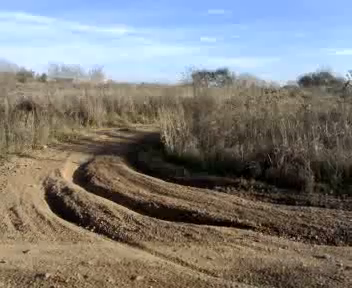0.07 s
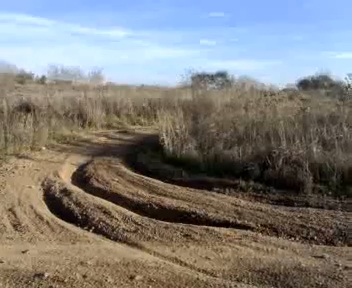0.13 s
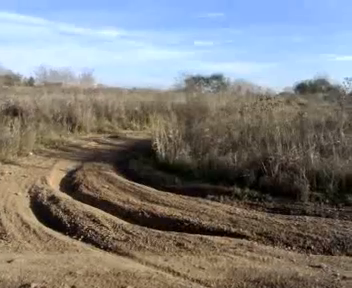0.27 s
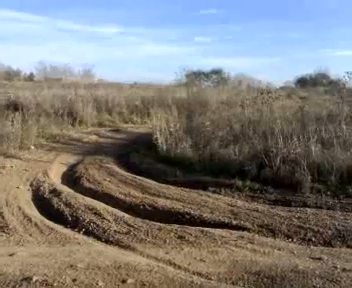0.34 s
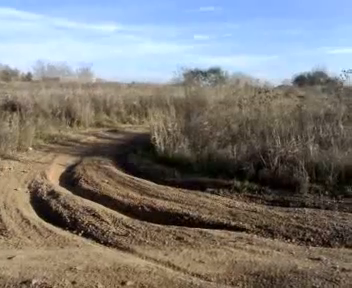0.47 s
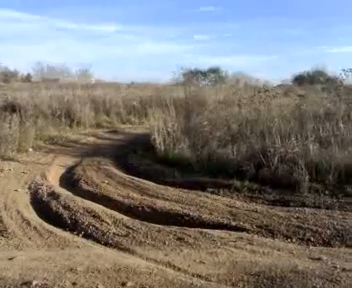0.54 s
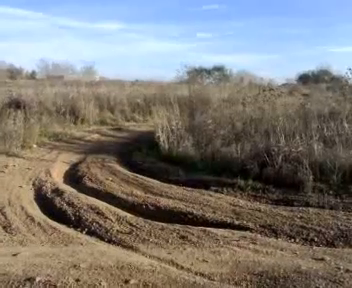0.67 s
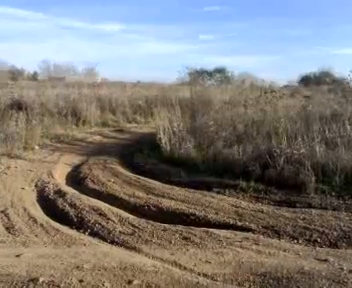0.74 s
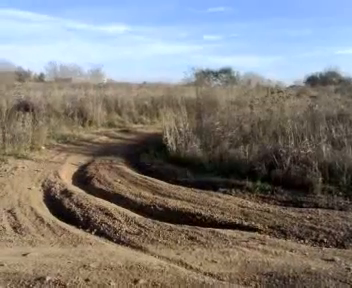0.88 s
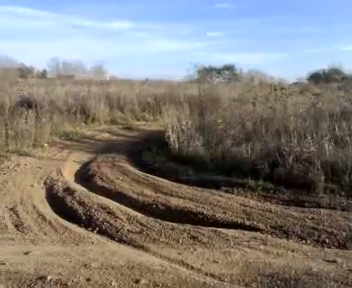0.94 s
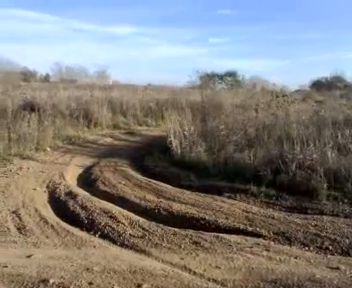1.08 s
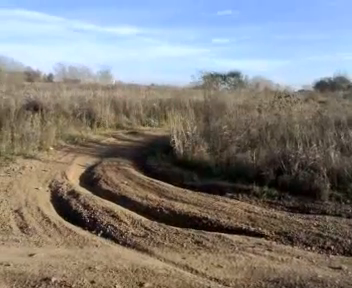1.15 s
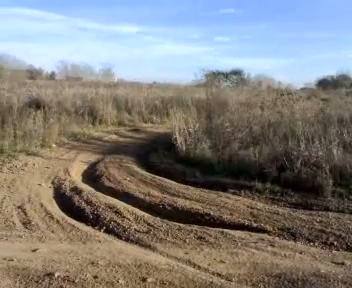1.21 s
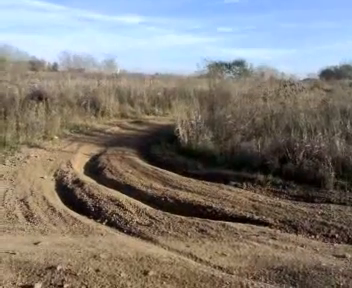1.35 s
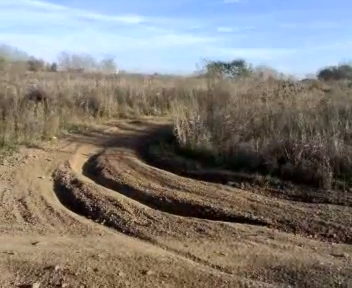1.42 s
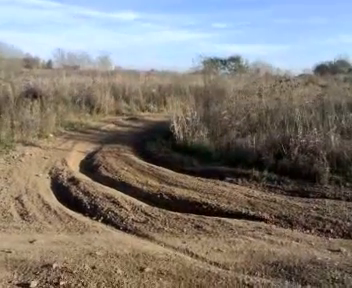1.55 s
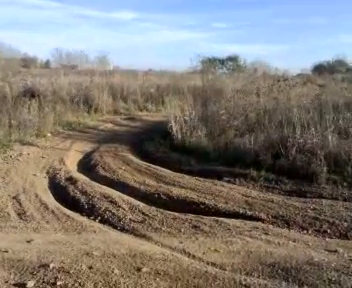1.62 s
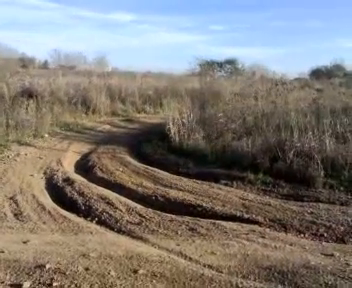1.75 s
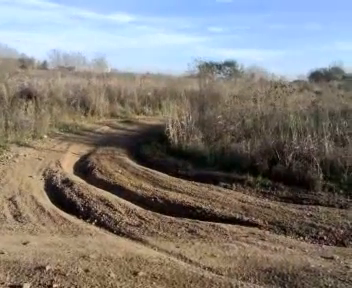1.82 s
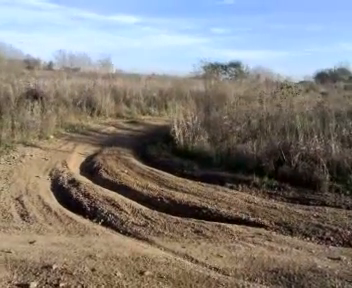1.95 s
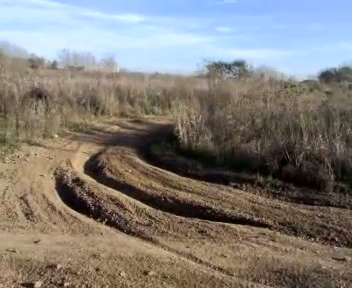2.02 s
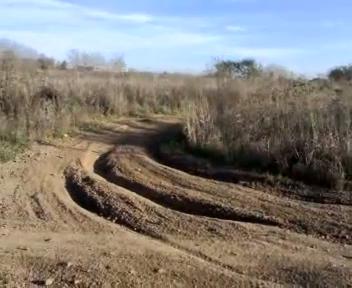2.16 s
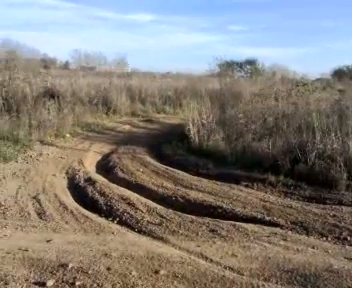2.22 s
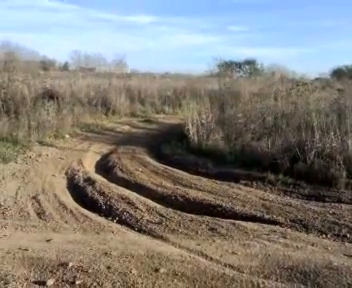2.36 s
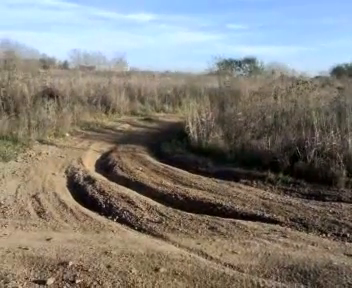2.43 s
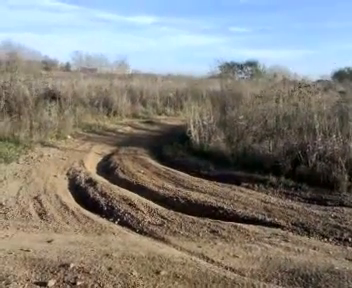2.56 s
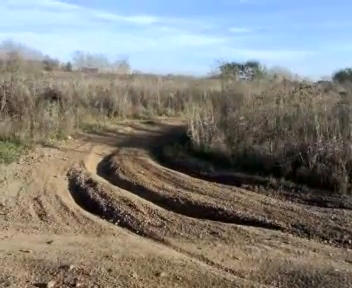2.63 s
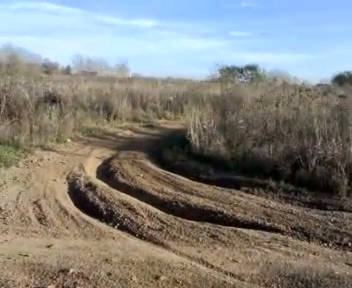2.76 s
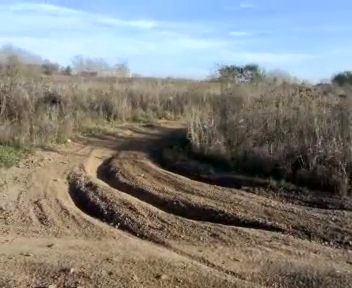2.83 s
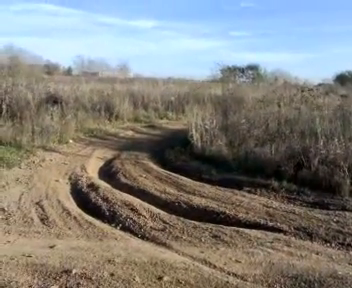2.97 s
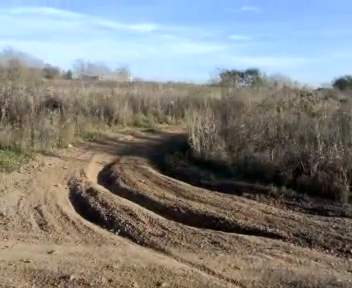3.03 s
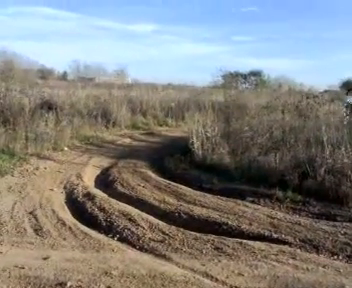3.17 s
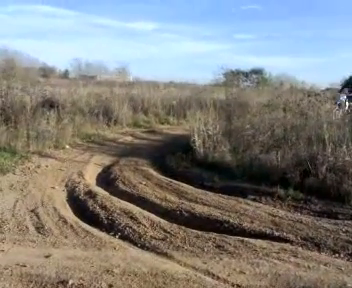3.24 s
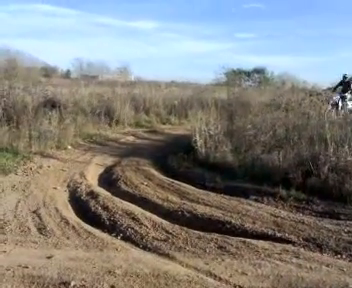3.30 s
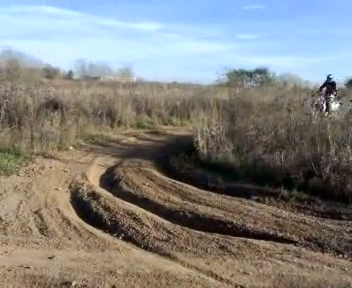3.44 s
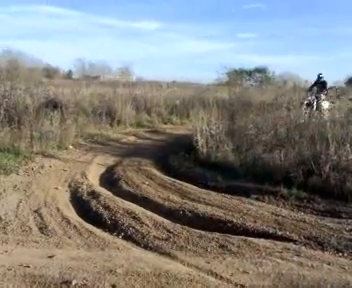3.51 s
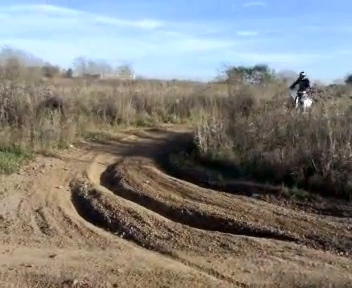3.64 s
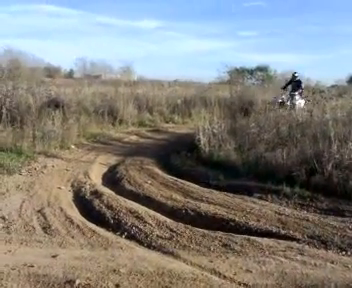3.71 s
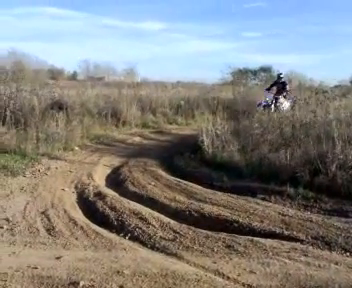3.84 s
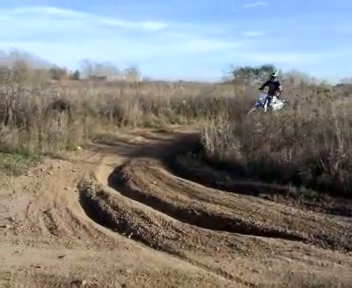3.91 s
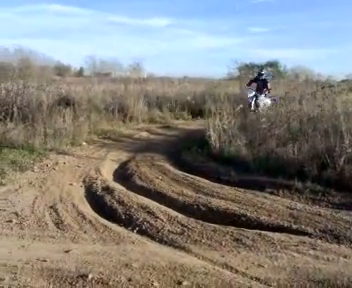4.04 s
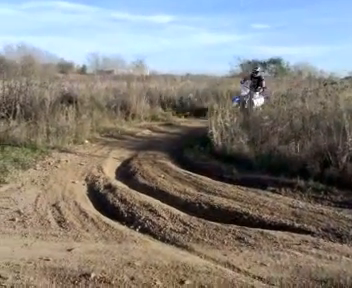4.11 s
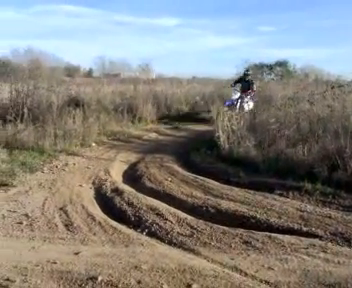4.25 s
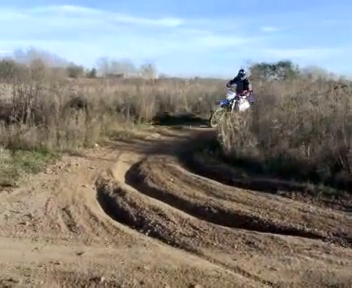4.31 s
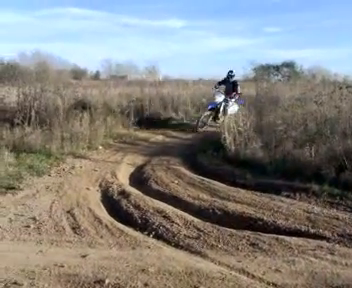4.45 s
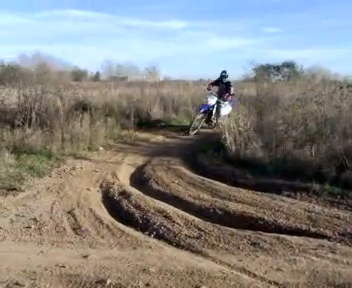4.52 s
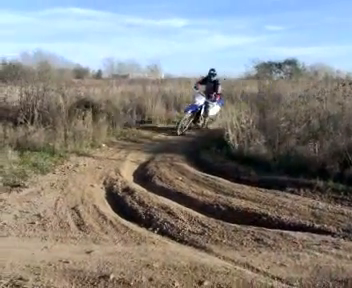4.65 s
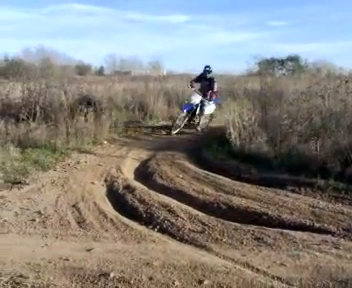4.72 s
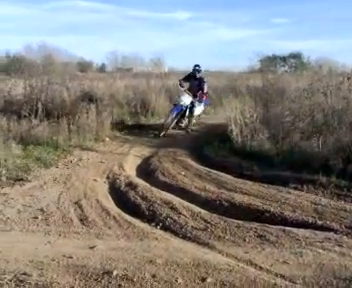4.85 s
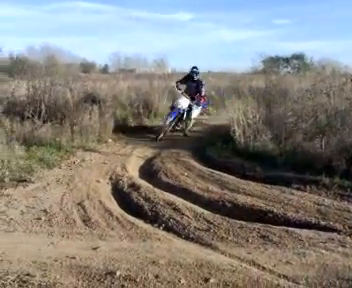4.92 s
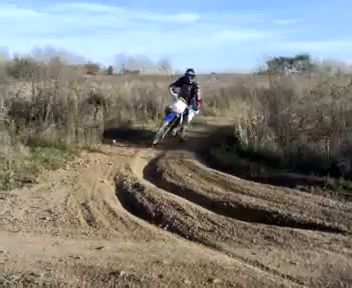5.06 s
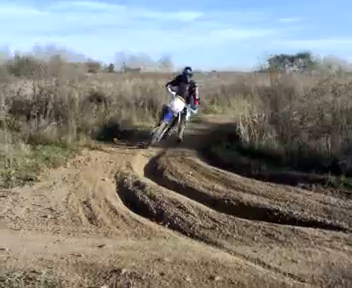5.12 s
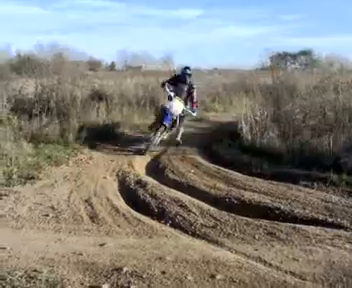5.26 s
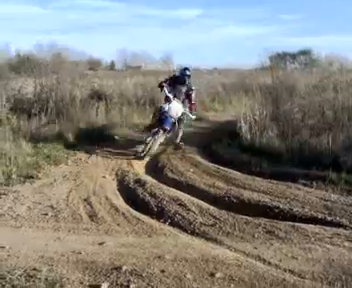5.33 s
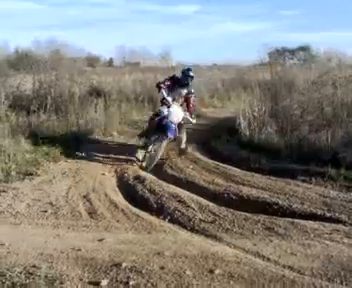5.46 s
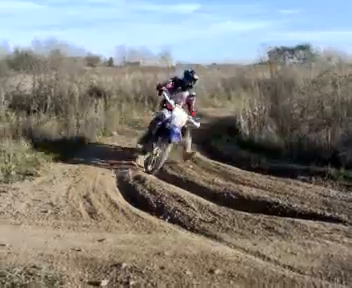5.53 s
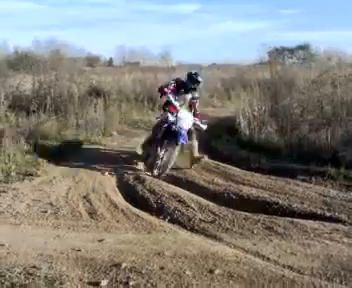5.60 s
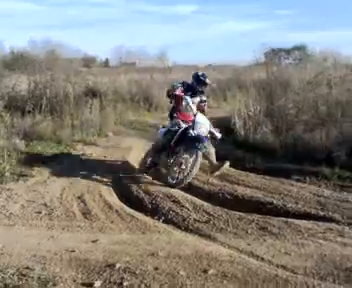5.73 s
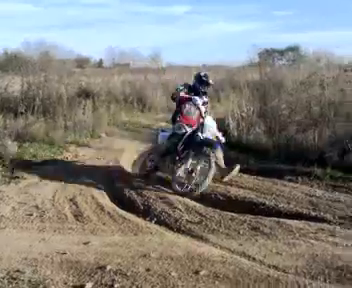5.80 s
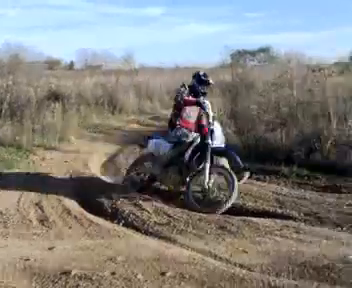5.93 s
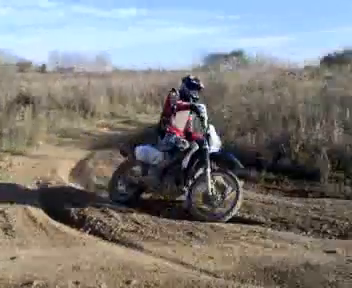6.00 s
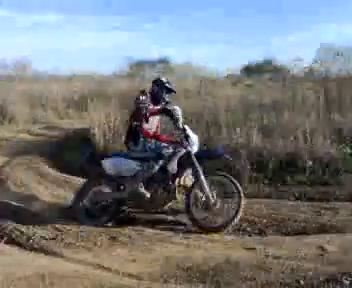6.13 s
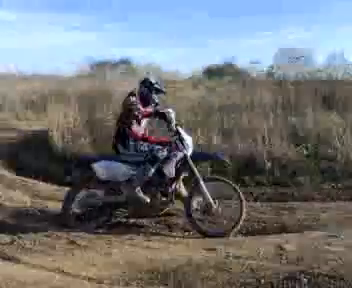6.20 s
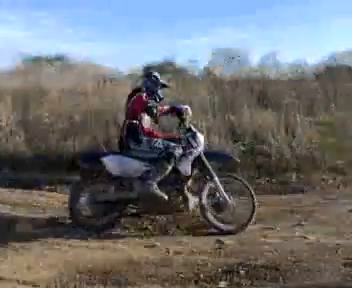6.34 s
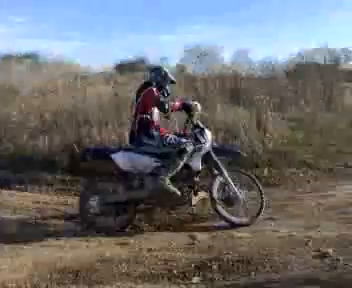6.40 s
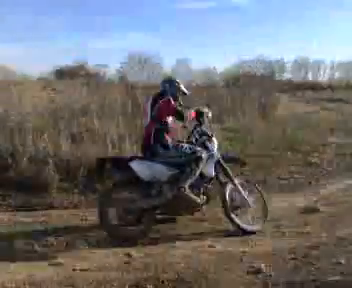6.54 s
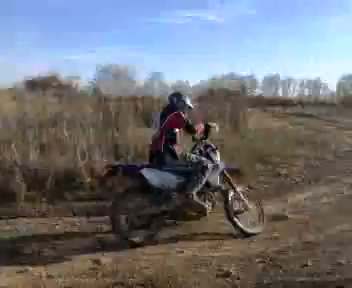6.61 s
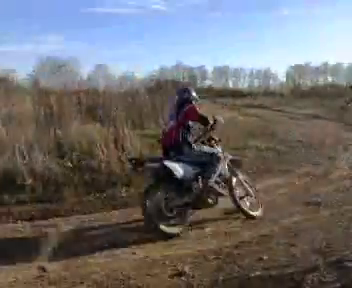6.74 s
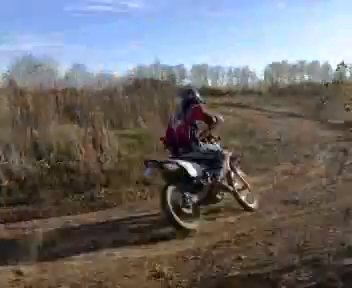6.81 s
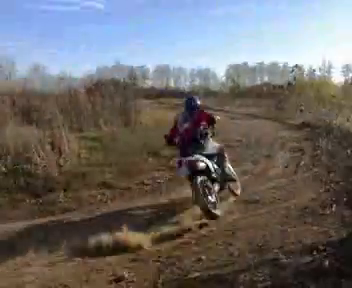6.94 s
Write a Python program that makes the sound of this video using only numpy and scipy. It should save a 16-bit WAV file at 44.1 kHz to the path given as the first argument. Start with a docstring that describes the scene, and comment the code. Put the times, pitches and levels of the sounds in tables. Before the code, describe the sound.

Light wind rumbles on a small microphone beside a dirt track as a four-stroke dirt bike approaches. Its pulsing engine climbs in pitch, then falls back to a chug for a corner, amid bright rattles and faint ticks of grit. After a short rev and a hollow knock, several bursts of throttle bring it right past, the exhaust barking and the engine ringing metallically, loudest at the end.

```python
"""A single-cylinder four-stroke dirt bike comes through tall grass, rounds a dirt corner and passes close.
Each firing sends a puff down the exhaust, which booms and barks, and knocks the engine cases, which
clatter and ping. Loose parts rattle over the ruts and grit ticks against the frame. Underneath are a
faint hum and a light wind buffeting a small microphone, which switches on abruptly."""
import sys
import numpy as np
from scipy import signal
from scipy.io import wavfile
from scipy.ndimage import uniform_filter1d

SR = 44100
rng = np.random.default_rng(int(sys.argv[2]) if len(sys.argv) > 2 else 0)


def output_pcm(signal):
    """Save a mono or channel-first signal as 16-bit PCM at the path in sys.argv[1].

    Samples are clipped to [-1, 1] before scaling.
    """
    pcm = np.clip(np.atleast_2d(signal).T, -1, 1) * 32767
    wavfile.write(sys.argv[1], SR, np.round(pcm).astype(np.int16))


N = 307377
TIME_S = np.arange(N) / SR


def gain_of(db):
    return 10 ** (np.asarray(db) / 20)


def between(ends, share):
    return ends[0] + (ends[1] - ends[0]) * share


def unit_rms(x):
    return x / np.sqrt(np.mean(x ** 2) + 1e-20)


def steadied(x, size=6000):
    """Divides out the level, averaged over size samples."""
    return x / np.sqrt(abs(uniform_filter1d(x ** 2, size)) + 1e-12)


def curves(rows):
    """One automation curve for each column after the time."""
    times, *columns = np.transpose(rows)
    return [np.interp(TIME_S, times, column) for column in columns]


def eq_curve(points, hz):
    """Joins the points along a log-frequency axis, as a column."""
    points_hz, values = np.transpose(points)
    return np.interp(np.log(hz + 1), np.log(points_hz + 1), values)[:, None]


def drift(size):
    """A random wander, smoothed over size samples."""
    return unit_rms(uniform_filter1d(uniform_filter1d(rng.standard_normal(N), size), size))


def resonate(x, hz, width_hz):
    """A resonance that can glide: shifts hz down to zero, smooths, and shifts back."""
    turn = np.exp(2j * np.pi * np.cumsum(hz * np.ones(len(x))) / SR)
    pole = np.exp(-np.pi * abs(width_hz) / SR)
    return 2 * (turn * signal.lfilter([1 - pole], [1, -pole], x / turn + 1e-18)).real


def ring(x, hz, width_hz):
    """A resonance with steep skirts and a soft attack."""
    return resonate(resonate(x, hz, 3 * width_hz), hz, width_hz)


# Partials of the hum: pitch_hz, level_db
HUM_PARTIALS = [(96.9, -42.5), (193.8, -45.5), (242.2, -53)]
# Fader on the whole hum: time_s, gain_db
HUM_FADER = [(.13, -3), (2.3, 0.5), (2.8, -13), (6.97, -24.5)]


def hum():
    """Faint low tones that waver together."""
    wavering_s = np.cumsum(1 + 0.014 * drift(5000)) / SR
    tones = sum(gain_of(db) * np.sin(2 * np.pi * hz * wavering_s) for hz, db in HUM_PARTIALS)
    return gain_of(curves(HUM_FADER)[0]) * np.sqrt(2) * tones


# Gusts on top of the breeze: peak_s, level_db, width_s
WIND_GUSTS = [(.36, -37.5, 0.09), (.56, -37.5, 0.16), (.78, -38, 0.048), (.99, -41.5, 0.06),
              (1.36, -38, 0.041), (2.39, -40, 0.052), (3, -36.5, 0.17), (3.4, -34, 0.056),
              (4.05, -55, 0.046), (4.24, -38, 0.059), (5.1, -43, 0.17), (6.9, -40.5, 0.22)]


def wind(breeze_db=-50):
    """Air buffets the microphone with a lumpy low rumble."""
    rumble = resonate(resonate(rng.standard_normal(N), 39, 78), 24, 87)
    gusts = sum(gain_of(db) * np.exp(-((TIME_S - s) / width) ** 2) for s, db, width in WIND_GUSTS)
    return (gain_of(breeze_db) + gusts) * steadied(rumble * gain_of(2.0 * drift(2000)), size=12000)


# Spray of grit: time_s, level_db
GRIT_LEVEL = [(.13, -57), (1.1, -63), (1.3, -66), (1.4, -56), (1.6, -55), (1.95, -55.5), (2.2, -61.5),
              (3.3, -53.5), (3.7, -51), (4.3, -57), (4.65, -59), (4.9, -58), (6.97, -58.5)]


def grit(specks_per_s=390, pitch_hz=4300):
    """Specks of uneven size hit the frame, each a tiny treble tick."""
    strikes = rng.random(N) < specks_per_s / SR
    sizes = gain_of(3.5 * np.minimum(rng.exponential(1, N), 3))
    return gain_of(curves(GRIT_LEVEL)[0]) * unit_rms(ring(strikes * sizes, pitch_hz, 870))


# Bright rattles: start_s, level_db, centre_hz, t60_s
BRIGHT_RATTLES = [(1.225, -45, 5770, .025), (1.326, -40, 5500, 0.022), (3.397, -34, 3800, .05),
                  (3.554, -36, 3860, .05), (3.66, -33.5, 4000, 0.11), (4.052, -30, 3640, 0.053),
                  (4.133, -32.5, 3610, .05), (4.277, -46, 3600, .06), (4.318, -41, 3770, 0.033),
                  (4.331, -26.5, 4300, 0.042), (4.416, -40, 4200, 0.11), (4.49, -29, 4100, 0.11),
                  (4.588, -24.5, 3840, 0.051), (4.633, -28, 3750, 0.037), (4.698, -29, 3500, 0.029),
                  (4.733, -27.5, 3900, 0.024), (5.371, -28, 2599, 0.054), (5.455, -28.5, 4300, 0.054),
                  (5.489, -26, 3300, 0.063), (6.102, -24, 3004, 0.052), (6.169, -30, 3977, .1)]
# Dry clicks: start_s, level_db, pitch_hz, t60_s
DRY_CLICKS = [(0.426, -17, 1110, 0.0082), (3.303, -15, 1200, 0.009), (4.317, -24, 1810, 0.042),
              (4.59, -24, 2650, 0.044), (4.638, -27.5, 2700, .03), (4.698, -27, 2560, .03),
              (5.446, -23, 1160, 0.099)]
# A hard hollow knock, then four softer ones at the firing rate as the throttle opens:
# start_s, level_db, pitch_hz, t60_s
HOLLOW_KNOCKS = [(5.452, -11, 567, 0.031), (5.478, -26, 664, .05), (5.508, -26, 626, .06),
                 (5.542, -26, 630, 0.036), (5.582, -27, 558, .1)]


def rattles_and_knocks(length=6000):
    """Loose parts rattle over the ruts in noise bursts; clicks ring at once, knocks swell and ring."""
    out, t = np.zeros(N + length), np.arange(length) / SR
    for start_s, db, hz, t60 in BRIGHT_RATTLES:
        noise = rng.standard_normal(length)
        spiky = noise * (1 + abs(np.roll(noise, 99)))
        burst = unit_rms(resonate(ring(spiky, hz, 1800), hz, 3000)) * np.minimum(t / 0.003, 1)
        out[round(start_s * SR):][:length] += gain_of(db - 60 * t / t60) * burst
    for start_s, db, hz, t60 in DRY_CLICKS:
        out[round(start_s * SR):][:length] += gain_of(db - 60 * t / t60) * np.sin(2 * np.pi * hz * t)
    for start_s, db, hz, t60 in HOLLOW_KNOCKS:
        attack = np.minimum(t / 0.0086, 1) ** 1.3
        decay = gain_of(db - 60 * np.maximum(t - .013, 0) / t60)
        out[round(start_s * SR):][:length] += attack * decay * np.sin(2 * np.pi * hz * t)
    return out[:N]


# Twists of the grip: open_s, shut_s, opening_share
THROTTLE_TWISTS = [(0.12, 1.45, 0.42), (1.438, 3.276, 0.88), (3.798, 3.905, 0.1), (5.336, 5.632, 0.7),
                   (6.106, 6.478, 0.65), (6.44, 6.651, 0.5), (6.63, 7.2, 0.74)]


def throttle(turn_s=0.085):
    """The grip ramps up, holds and ramps down: gas, from 0 (shut) to 1 (wide open)."""
    ramps = [opening * np.clip(np.minimum(TIME_S - open_s, shut_s - TIME_S) / turn_s + .5, 0, 1)
             for open_s, shut_s, opening in THROTTLE_TWISTS]
    return np.max(ramps, axis=0)


# The bike's approach: time_s, close_share
APPROACH = [(.13, 0), (3, 0.078), (4.5, 0.18), (5.3, 0.18), (6.1, 0.73), (6.97, 0.89)]


def nearness():
    """Perspective, from 0 (off in the grass) to 1 (close by)."""
    return curves(APPROACH)[0]


# Engine revs: time_s, firing_hz
REVS = [(.13, 22.18), (.36, 23.58), (.59, 23.59), (1.19, 21.68), (1.44, 24.11), (1.73, 32.19),
        (1.98, 32.29), (2.28, 31.39), (2.43, 36.09), (2.63, 37.59), (2.87, 46.37), (2.96, 41.81),
        (3.03, 46.66), (3.1, 42.3), (3.23, 46), (3.26, 38.5), (3.39, 36.23), (3.46, 32.98), (3.68, 30.27),
        (3.8, 32.92), (3.92, 33.75), (4.2, 25.71), (4.42, 18.27), (4.56, 19.95), (4.66, 22.77),
        (4.8, 24.07), (5.05, 23.8), (5.29, 23.3), (5.35, 32), (5.62, 31.8), (5.7, 23.5), (5.88, 23.5),
        (6.02, 26.39), (6.16, 30.16), (6.24, 25.28), (6.32, 28.48), (6.4, 28.77), (6.48, 24.48),
        (6.59, 25.73), (6.66, 28.25), (6.82, 28.57), (6.89, 33.24), (6.97, 33.74)]


def firings(gas, uneven_db=(1.1, 1.2)):
    """The cylinder fires once a cycle: gives the rate, the cycle count and a kick of uneven strength."""
    firing_hz = curves(REVS)[0]
    cycles = np.cumsum(firing_hz) / SR + .3 + .007 * drift(1200)
    fires = np.diff(np.floor(cycles), prepend=0) > 0
    kicks = fires * gain_of(between(uneven_db, gas) * rng.standard_normal(N))
    return firing_hz, cycles, kicks


# Colour of the clatter through the grass: frequency_hz, gain_db
FAR_EQ = [(190, -20.5), (330, 7), (352, -15.5), (385, -4.5), (450, -6.5), (904, -0.5), (1220, -2),
          (1350, -1.5), (1580, -2), (2150, -4), (2930, -14), (4790, -20.5), (7240, -43), (9410, -72),
          (15900, -120)]
# Colour of the clatter close by: frequency_hz, gain_db
NEAR_EQ = [(190, -32), (300, -5.5), (385, -20.5), (499, -4.5), (764, 1.5), (848, 1.5), (928, -6.5),
           (1280, -7), (1620, -8.5), (2260, -10), (2640, -13), (3050, -13.5), (3650, -10.5), (5660, -22.5),
           (7240, -38), (9410, -58), (15900, -120)]
# Small case modes come and go as the bike sways: frequency_hz, spread_db
SWAY_GLINTS = [(400, 3.5), (1500, 1.5), (4500, 3.5), (7500, 2)]
# Outer bands against the midrange rasp: time_s, low_db, treble_db
CLATTER_BALANCE = [(.13, -3.5, -16), (1.2, -2.5, -18.5), (1.5, 0, -13.5), (2.2, 0, -12.5), (2.9, -5, -6.5),
                   (3.3, -5.5, -11), (4, -2, -8), (5.1, 1.5, -7), (5.28, 1.5, -7), (5.47, 1.5, -6),
                   (5.8, 2.5, -6.5), (6.13, -2, -1.5), (6.55, 1.5, -2.5), (6.97, -1.5, -0.5)]


def clatter(beat, gas, near, load_range=(0.071, 0.17), crossovers_hz=(1100, 3400)):
    """Grainy case noise, coloured by distance, that pulses harder under power and close by."""
    load = np.clip(between(load_range, gas) + .7 * gas * near ** 2, 0, 1)
    grain = gain_of(0.86 * drift(60) + 0.67 * drift(1500))
    noise = (1 - load + load * beat) * grain * rng.standard_normal(N)
    hz, frame_s, spectrum = signal.stft(noise, SR, nperseg=1024)
    close = near[np.clip((frame_s * SR).astype(int), 0, N - 1)]
    spectrum *= gain_of(between((eq_curve(FAR_EQ, hz), eq_curve(NEAR_EQ, hz)), close))
    sway = uniform_filter1d(rng.standard_normal(spectrum.T.shape).T, size=24, axis=1)
    glints = unit_rms(uniform_filter1d(sway, size=2, axis=0))
    spectrum *= gain_of(eq_curve(SWAY_GLINTS, hz) * glints)
    band = np.digitize(hz, crossovers_hz)[:, None]
    bands = (signal.istft(spectrum * (band == k), SR, nperseg=1024)[1][:N] for k in range(3))
    low, rasp, treble = (steadied(x, size=8000) for x in bands)
    low_db, treble_db = curves(CLATTER_BALANCE)
    return rasp + gain_of(low_db) * low + gain_of(treble_db) * treble


# Case modes heard close by: pitch_hz, width_hz, gain_db
SHELL_MODES = [(752, 64, -15), (816, 89, -13.5), (1301, 220, -4.5), (654, 120, -18.5), (4100, 290, -8.5)]
PIPE_DELAY = round(.011 * SR)  # samples by which the exhaust puff and the shell's ring trail a firing


def shell_ring(knocks, pass_s=6, pass_width_s=0.17):
    """The knocked cases ring; their low modes slide down as the bike goes by."""
    slide = 1 - 0.033 * np.tanh((TIME_S - pass_s) / pass_width_s)
    delayed = np.roll(knocks, PIPE_DELAY)
    return sum(gain_of(db) * unit_rms(ring(delayed, hz * (slide if hz < 2000 else 1), width))
               for hz, width, db in SHELL_MODES)


# The two plates as they turn to face the microphone: time_s, lower_pitch_hz, lower_db, upper_db
PLATE_PINGS = [(.13, 2430, -14, -6.5), (1.9, 2360, -29, -11.5), (2.5, 2330, -18.5, 4.5),
               (2.75, 2370, -13, 7.5), (2.9, 2360, -3, 2), (3.08, 2360, 0, -1.5), (3.3, 2320, -18, -16),
               (5.3, 2350, -11.5, -17.5), (6.2, 2300, -4.5, -29.5), (6.3, 2420, 5.5, -28),
               (6.45, 2300, 0, -8.5), (6.6, 2200, 1.5, -34), (6.85, 2240, 2.5, -27.5),
               (6.97, 2200, -29, -33)]
# Modes of the upper plate: pitch_hz, width_hz, gain_db
UPPER_PLATE_MODES = [(2552, 59, -2), (5320, 66, -17)]


def cover_plates(kicks, beat, gas, scrape=.45, gain_range_db=(-11.5, -7)):
    """Each firing taps two cover plates, which ping louder as the throttle opens."""
    lower_hz, lower_db, upper_db = curves(PLATE_PINGS)
    taps = unit_rms(kicks) + scrape * beat * rng.standard_normal(N)
    upper = sum(gain_of(db) * steadied(ring(taps, hz, width)) for hz, width, db in UPPER_PLATE_MODES)
    lower = steadied(ring(taps, lower_hz, 95))
    return gain_of(between(gain_range_db, gas)) * (gain_of(upper_db) * upper + gain_of(lower_db) * lower)


# Gear whistle against the rasp: time_s, pitch_hz, gain_db
GEAR_WHISTLE = [(2.7, 4840, -50), (2.9, 5010, -29), (3.15, 5010, -21), (3.3, 5070, -47)]


def gear_whistle():
    """A gear whistles at high revs: a very narrow band of noise."""
    pitch_hz, gain_db = curves(GEAR_WHISTLE)
    return gain_of(gain_db) * unit_rms(ring(rng.standard_normal(N), pitch_hz, 25))


# Whine against the rasp: time_s, gain_db
WHINE_FADER = [(.13, -46), (3.2, -23.5), (3.5, -19), (5.4, -13.5), (5.8, -13), (5.86, -5), (5.93, -11),
               (6.01, -1), (6.1, -8), (6.28, -5), (6.5, -18), (6.97, -31.5)]


def metal_whine(knocks, pitch_hz=3715):
    """The engine's knocks keep one thin metal mode singing."""
    return gain_of(curves(WHINE_FADER)[0]) * steadied(ring(knocks, pitch_hz, 60))


# Level of the rasp, which all the case layers ride on: time_s, level_db
CASE_LEVEL = [(0.15, -37.5), (1.53, -40.5), (2.35, -38), (2.88, -31), (3.2, -32), (3.35, -35), (3.56, -36),
              (4.3, -37.5), (4.32, -35), (4.36, -37.5), (4.61, -36.5), (4.95, -38), (5.31, -37.5),
              (5.44, -32.5), (5.46, -27), (5.5, -31.5), (5.71, -37), (6.09, -34), (6.18, -26),
              (6.22, -26.5), (6.46, -22.5), (6.6, -25.5), (6.69, -20.5), (6.71, -23.5), (6.94, -19),
              (6.96, -21.5)]


def engine_cases(cycles, kicks, gas, near, uneven_db=1.8):
    """The firing and, half a cycle on, the valves beat the cases; uneven under power close by."""
    firing = 1.8 * np.exp(-((cycles % 1) / 0.36) ** 2)
    valves = 0.92 * np.exp(-((cycles + .5) % 1) / 0.26)
    per_cycle = rng.standard_normal(N)[cycles.astype(int)]
    beat = (firing + valves) * gain_of(uneven_db * gas * near ** 2 * per_cycle)
    body = clatter(beat, gas, near)
    knocks = 0.49 * unit_rms(kicks) + beat ** 0.96 * rng.standard_normal(N)
    metal = near * shell_ring(knocks) + cover_plates(kicks, beat, gas) + metal_whine(knocks)
    return gain_of(curves(CASE_LEVEL)[0]) * (body + metal + gear_whistle())


# Low pipe modes: ratio_to_boom_pitch, width_hz, gain_db
BOOM_MODES = [(1.008, 18.5, 10.5), (1.14, 12, -6)]


def pipe_boom(puffs, firing_hz, gas, near, pitch_range_hz=(103.6, 118.2), idle_hz=21.9):
    """Puffs ring the low pipe modes, whose pitch lifts with throttle and, up to a limit, with revs."""
    rev_lift_hz = 0.89 * np.minimum(firing_hz - idle_hz, 3.9)
    turn_lift_hz = 13 * near ** 2  # the pipe turns sideways as the bike nears
    boom_hz = between(pitch_range_hz, gas) + rev_lift_hz + turn_lift_hz
    boom = 0
    for ratio, width, db in BOOM_MODES:
        front = resonate(puffs, ratio * boom_hz, width_hz=62)  # an attack of a few ms
        boom += gain_of(db) * resonate(front, ratio * boom_hz, width)
    return steadied(boom)


# One low bark mode, then two high ones: pitch_hz, width_hz, gain_db
BARK_MODES = [(200.5, 60, 0), (269.8, 48, 4.5), (317.6, 56, 2.5)]


def pipe_bark(puffs, boom, gas, near, crest_range=(0.45, 0.047)):
    """The upper pipe modes give a low and a high bark; the top mode fades under power close by."""
    low, mid, top = (gain_of(db) * resonate(ring(puffs, hz, width), hz, 2 * width)
                     for hz, width, db in BARK_MODES)
    crests = boom ** 2 - uniform_filter1d(boom ** 2, size=400)  # strong waves steepen: an octave up
    crest_share = between(crest_range, gas)
    low_bark = steadied(crest_share * crests + (1 - crest_share) * steadied(low))
    high_bark = steadied(gain_of(-17 * gas * near ** 2) * top - mid)
    return low_bark, high_bark


def crank_tone(cycles, gas, gain_range_db=(-18, 3.5)):
    """The crank turns twice a cycle and sounds as a tone under load."""
    tone = np.sin(4 * np.pi * cycles + 1.0) + 0.046 * np.sin(2 * np.pi * cycles)
    return gain_of(between(gain_range_db, gas) + 1.9 * drift(2500)) * tone


# Exhaust mix, barks set against the boom: time_s, boom_db, low_bark_db, high_bark_db
EXHAUST_MIX = [(0.15, -42, -7, -6), (0.3, -34.5, -7, -16), (0.41, -39.5, -7, -9.5),
               (0.53, -37.5, -13, -7.5), (0.85, -35.5, -5.5, -11.5), (1.08, -42.5, -7.5, 0.5),
               (1.16, -39.5, -3, -9.5), (1.89, -41, -3.5, 3), (1.93, -38.5, -10.5, -12),
               (2.29, -39.5, -4, -5), (2.99, -34, -3, -3.5), (3.11, -39.5, 3, 0.5), (3.2, -32.5, -4.5, 0),
               (3.26, -37.5, -1, -11), (3.33, -29.5, -10, -8.5), (4.17, -29, -7.5, -17),
               (4.36, -32.5, -8, -30), (4.45, -37, -8, -12), (4.54, -32, -6.5, -9),
               (4.66, -30.5, -7.5, -21), (4.86, -30.5, -6.5, -27), (4.92, -28, -6.5, -20),
               (5.16, -28, -5, -25), (5.25, -31.5, -3, -11), (5.33, -28, -13, -17), (5.42, -33, 0.5, -2),
               (5.65, -29, -12.5, -13), (5.91, -29.5, -9, -8.5), (6.14, -26, -12.5, -14),
               (6.2, -27, -17, -3), (6.3, -23.5, -13, -6), (6.73, -20.5, -13.5, -15), (6.96, -21, 2.5, -8)]


def exhaust(firing_hz, cycles, kicks, gas, near, rough_range=(.12, .22), turbulence_range=(.25, .3)):
    """Each firing thumps through the pipe as a puff, roughened by noise."""
    gulps = np.diff(np.floor(cycles + .5), prepend=0) > 0  # an open throttle gulps air half a cycle later
    puffs = -np.roll(unit_rms(kicks) + 0.19 * gas * unit_rms(gulps), PIPE_DELAY)
    noise_share = 1 - .6 * gas * near ** 2  # cleaner under power close by
    grass_blur = .55 * np.clip(1 - (TIME_S / 1.9) ** 4, 0, 1)  # gone by 1.9 s
    stumble = .1 * np.maximum(23 - firing_hz, 0)  # rougher below 23 firings a second
    roughness = between(rough_range, gas) * noise_share + grass_blur + stumble
    puffs += roughness * rng.standard_normal(N)
    boom = pipe_boom(puffs, firing_hz, gas, near)
    turbulence = between(turbulence_range, gas) * noise_share * rng.standard_normal(N)
    low_bark, high_bark = pipe_bark(puffs + turbulence, boom, gas, near)
    boom_db, low_db, high_db = curves(EXHAUST_MIX)
    bark = gain_of(low_db) * low_bark + gain_of(high_db) * high_bark
    return gain_of(boom_db) * (boom + bark + crank_tone(cycles, gas))


def scene():
    """The bike over wind and hum, in mono. Every range setting runs from throttle shut to wide open."""
    gas, near = throttle(), nearness()
    firing_hz, cycles, kicks = firings(gas)
    engine = exhaust(firing_hz, cycles, kicks, gas, near) + engine_cases(cycles, kicks, gas, near)
    return (engine + rattles_and_knocks() + grit() + wind() + hum())[None]


def record(dry, on_s=.131, ceiling=.8, cutoff_hz=7450):
    """The small microphone switches on, rounds off the peaks and loses the top treble."""
    switch = np.clip((TIME_S - on_s) / .002, 0, 1)
    rounded = ceiling * np.tanh(dry / ceiling)
    lowpass = signal.firwin(511, cutoff_hz, window=("kaiser", 9), fs=SR)
    return signal.oaconvolve(rounded * switch, lowpass[None], "same")


dry = scene()
out = record(dry)
output_pcm(out)
```